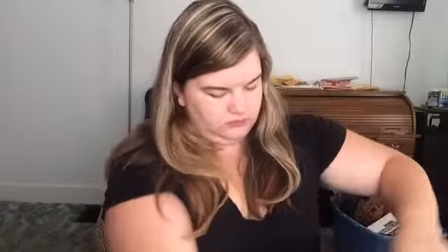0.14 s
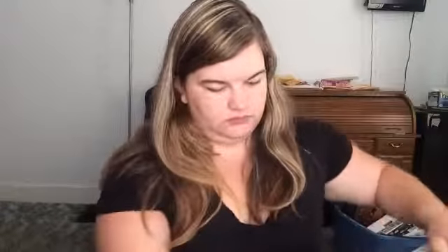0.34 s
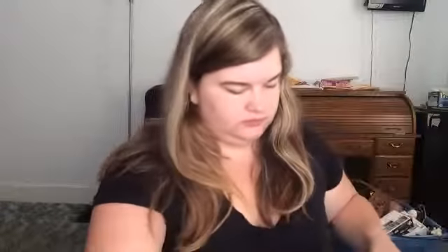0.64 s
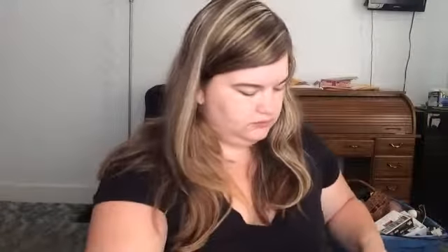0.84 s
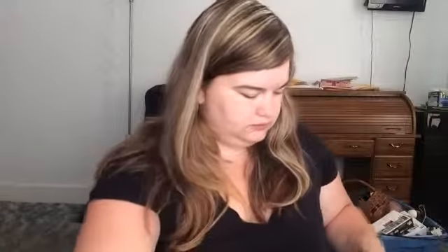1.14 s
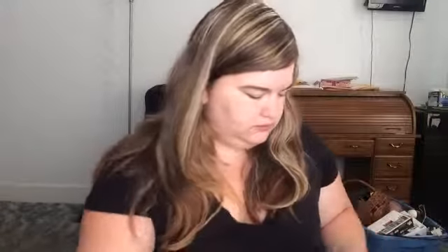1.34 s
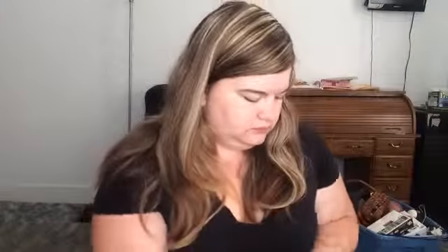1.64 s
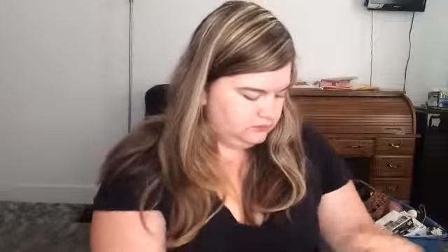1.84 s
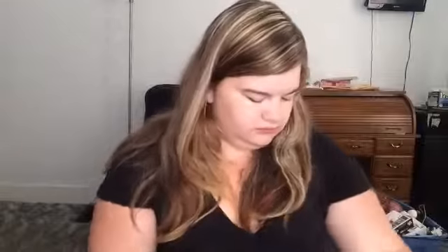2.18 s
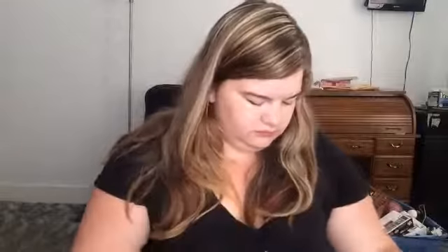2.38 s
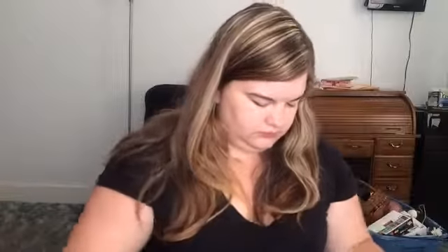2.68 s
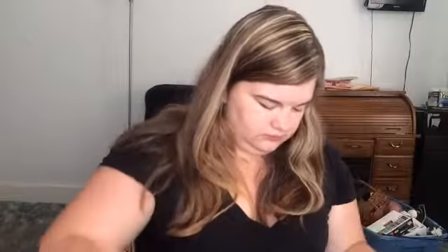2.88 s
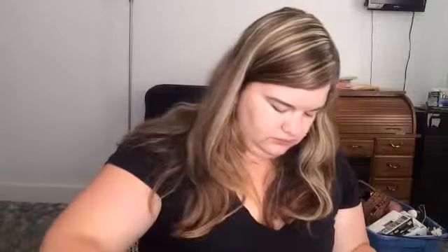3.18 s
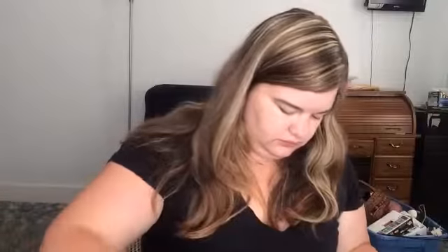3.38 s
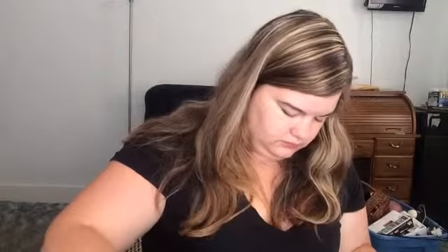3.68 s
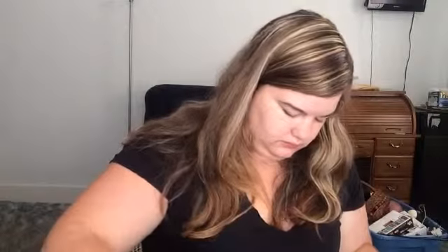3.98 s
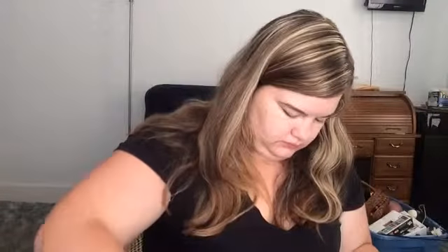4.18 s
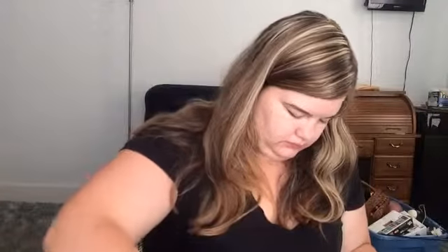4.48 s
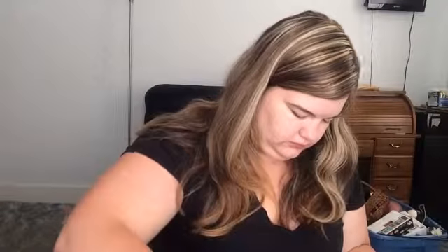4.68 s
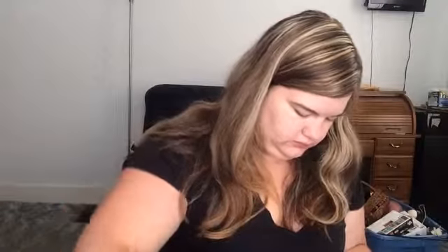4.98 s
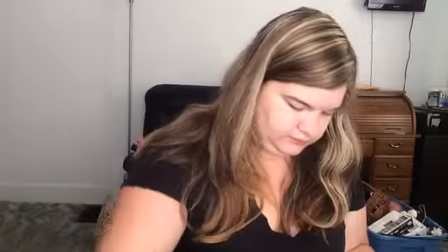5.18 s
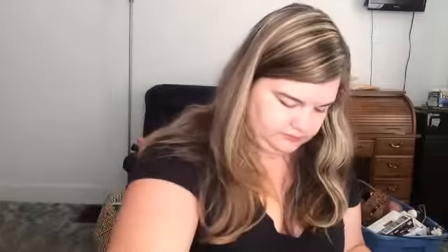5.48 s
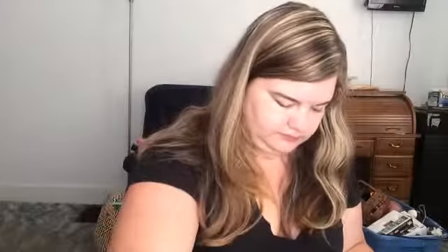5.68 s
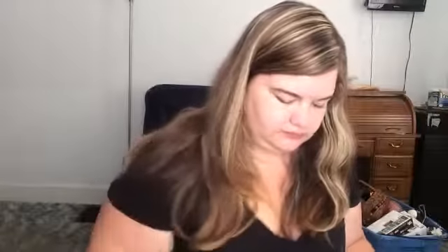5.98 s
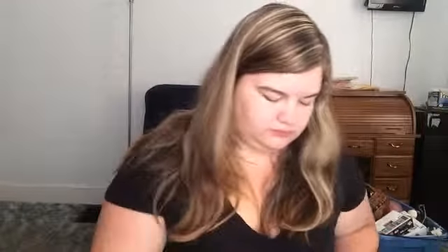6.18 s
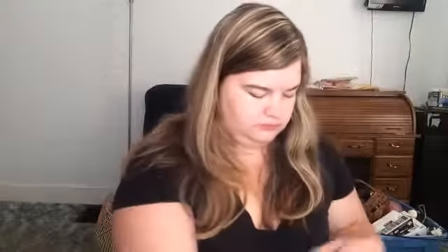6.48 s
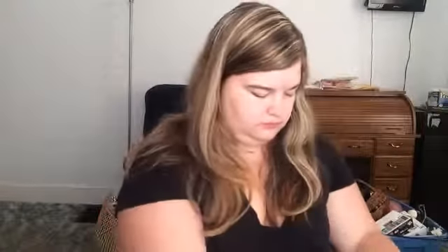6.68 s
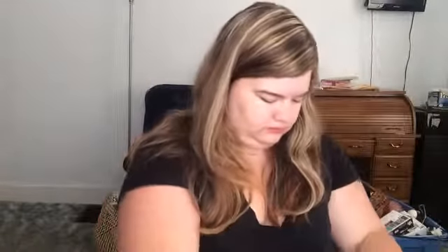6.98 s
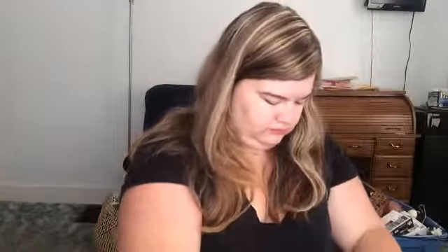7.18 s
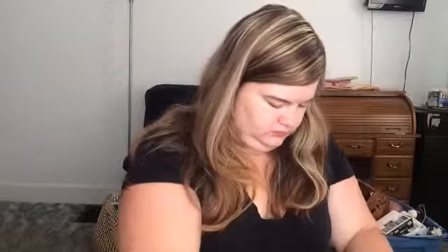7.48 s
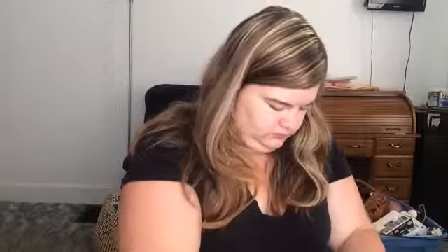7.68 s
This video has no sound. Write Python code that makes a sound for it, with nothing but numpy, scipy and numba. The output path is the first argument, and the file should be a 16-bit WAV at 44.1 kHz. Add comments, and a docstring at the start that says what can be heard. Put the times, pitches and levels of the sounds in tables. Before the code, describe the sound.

Close cardboard handling in a small room: dull thumps, scrapes and crisp cracks, a hard rattling scissors knock, then one heavy thump.

```python
"""A cardboard box is handled on a desk near a microphone in a small room, for just under 8 seconds.
First hands thump and rub the box and tape cracks lightly; at 2 s scissors knock softly on the desk.
The cracking is strongest near 4 s, and from 5.4 to 5.7 s the scissors knock hard: desk and steel ring.
A heavy thump comes near 6.8 s, then sharp cracks and last rubs. Thumps, cracks and desk knocks are
decaying tones and bursts of clicks with a room tail; rubbing is many tiny slips, over quiet room air."""
import sys
import numpy as np
from scipy import signal
from scipy.fft import rfft, irfft
from scipy.io import wavfile
from scipy.ndimage import uniform_filter1d
from numba import njit

SR = 44100
rng = np.random.default_rng(int(sys.argv[2]) if len(sys.argv) > 2 else 0)


def persist_wave(psi):
    """Save psi, clipped to +-1, as 16-bit WAV."""
    counts = np.round(np.clip(psi, -1, 1) * 32767).astype(np.int16)
    wavfile.write(sys.argv[1], SR, np.atleast_2d(counts).T)


N = 345744

# tones that the cardboard panels ring at: one column (pitch [Hz])
PANEL_TONES = [95, 135, 180, 215, 255, 295, 340, 400, 450, 510, 590, 700, 860]
# scissors on the desk: (time [s], peak of the ringing desk [dB], peak of the clack [dB],
# steel ring [dB], strength of the rattle [dB], boom of the desk legs [dB])
SCISSOR_KNOCKS = [(2.072, -26, -40, -78, -19, -35.5), (5.415, -15, -32.5, -61, -11.5, -58),
                  (5.452, -27.5, -44, -80, -8, -63), (5.535, -37, -68, -86, -25, -70),
                  (5.611, -15, -31, -72, -4, -72), (5.692, -15.5, -39, -46, -9.5, -44)]


def thumps(soft_db=10, fall_db=10, near_db=-2, attack_s=0.003, t60=0.064, body_t60=0.14):
    """A soft push rings the panel tones near its own pitch and shoves the whole box."""
    # thumps: (time [s], peak of the panels [dB], pitch of the pressed panel [Hz], whole box [dB])
    thump_table = [(0.104, -42.5, 334, -47), (0.237, -54.5, 443, -65), (0.592, -34, 182, -51),
                   (0.595, -38, 450, -65), (0.638, -30.5, 182, -51), (0.643, -32, 425, -65),
                   (0.668, -33, 332, -53), (0.743, -33, 211, -60), (0.767, -25, 298, -62),
                   (1.007, -41, 232, -70), (1.492, -47.5, 199, -41), (1.514, -45, 415, -59),
                   (1.545, -45, 400, -47), (1.575, -35.5, 170, -37), (1.654, -38, 323, -64),
                   (1.677, -39, 504, -54), (2.606, -45, 420, -66), (2.939, -31.5, 330, -43),
                   (3.076, -38.5, 292, -42), (3.523, -25, 422, -35), (3.539, -42, 446, -47),
                   (3.772, -28.5, 314, -43), (3.831, -36, 273, -61), (3.859, -40, 324, -64),
                   (4.079, -26, 436, -38), (4.123, -27, 315, -34), (4.254, -24.5, 333, -34.5),
                   (4.415, -43, 330, -64), (4.523, -32, 323, -44), (4.632, -33.5, 298, -57),
                   (6.013, -39.5, 261, -47), (6.082, -38, 289, -37), (6.149, -37.5, 311, -58),
                   (6.219, -44, 404, -52), (6.418, -41, 170, -46.5), (6.566, -48, 407, -43),
                   (6.662, -37, 298, -55), (6.714, -29.5, 330, -31), (6.776, -17, 252, -28.5),
                   (6.792, -31, 186, -43), (6.819, -30, 163, -48), (7.089, -35.5, 324, -56),
                   (7.109, -27.5, 340, -57), (7.361, -50.5, 273, -72), (7.44, -48, 290, -51),
                   (7.742, -39.5, 340, -65), (7.805, -35.5, 336, -67)]
    out = np.zeros(N)
    scatter = 3.87 * rng.standard_normal((len(thump_table), len(PANEL_TONES) + 1))
    rise = np.clip(np.arange(SR // 2) / SR / attack_s, 0, 1) ** 2
    for (s, peak_db, hz, body_db), (detune, *chance) in zip(thump_table, scatter):
        modes = [(hz, 0, t60)]
        for tone_hz in PANEL_TONES:
            # quieter with each octave away from the pitch, and again with each octave above 560 Hz
            distance_db = fall_db * abs(np.log2(tone_hz / hz))
            softness_db = soft_db * max(np.log2(tone_hz / 560), 0)
            modes.append((tone_hz, near_db - distance_db - softness_db, t60))
        panels = crest(rise * ring(modes, [0, *chance]), peak_db)
        body = ring([(122 + 3 * detune, body_db, body_t60)], [0])
        add(out, s, panels + rise * body)
    return out


def cracks(tock_t60=0.04, snap_t60=0.012, after_t60=0.11, tock_width=1.172, after_width=2.75):
    """A tock of the board and a bright snap, then fibres and glue that go on crackling."""
    # cracks of tape and board: (time [s], peak of the tock [dB], pitch of the tock [Hz],
    # bright snap before the offsets below [dB], crackle after it, relative to tock and snap [dB])
    crack_table = [(0.205, -49, 3060, -59, -11), (0.443, -59, 1130, -66, -5), (0.54, -46.5, 1860, -62, -14),
                   (0.61, -43, 1810, -42, -20), (0.641, -38, 1100, -43.5, -10),
                   (1.54, -40.5, 1080, -66, -11.5), (1.681, -40, 860, -68, -12),
                   (1.701, -41, 900, -39.5, -30), (2.607, -49, 1480, -52, -1),
                   (2.939, -48.5, 834, -59.5, -9.5), (3.045, -52.5, 1170, -61, -22),
                   (3.058, -60, 3500, -50, -20), (3.077, -43.5, 1970, -37.5, -10.5),
                   (3.376, -47, 1860, -70, -31), (3.387, -43, 1850, -71, -40),
                   (3.521, -39.5, 860, -54, -3.5), (3.771, -39, 890, -39.5, -3.5),
                   (3.785, -40, 2420, -32, -19), (3.864, -34, 936, -37, -10.5),
                   (4.082, -23, 910, -25.5, -9), (4.122, -26, 3240, -41, -11), (4.138, -29, 3650, -36, -24),
                   (4.255, -25, 850, -25.5, -13), (4.424, -35.5, 1130, -48, -9.5),
                   (4.5, -32.5, 3500, -55, -21), (4.524, -36, 3150, -52, -11), (4.619, -35, 1200, -50, -9),
                   (4.634, -30.5, 3380, -55, -7), (4.643, -46, 1630, -35.5, -15.5),
                   (4.873, -48, 2100, -56, -28), (5.026, -40, 1500, -33.5, -12),
                   (6.011, -47, 855, -52, -12), (6.424, -45, 1138, -62, -16),
                   (6.667, -35, 950, -50.5, -9.5), (6.717, -34.5, 840, -62, -32),
                   (6.778, -34.5, 890, -51, -10.5), (7.082, -42, 1480, -40, -11),
                   (7.091, -29.5, 1450, -40, -4), (7.111, -22.5, 2670, -48, -4),
                   (7.293, -53, 3520, -51, -11.5), (7.7, -58, 2210, -42.5, -26),
                   (7.721, -41.5, 1940, -38.5, -6)]
    out = np.zeros(N)
    for s, tock_db, hz, snap_db, after_db in crack_table:
        tock = band(breaking(), hz / tock_width, hz * tock_width)
        fibres = band(breaking(), hz / after_width, hz * after_width)
        snap = band(breaking(), 1900, 12500)
        start = crest(tock * fade(tock_t60, .25), tock_db)
        start += crest(snap * fade(snap_t60, .25), snap_db + 6)
        # the snap played backwards gives the bright part of the crackle
        after = undb(tock_db - 0.5) * unit(fibres) + undb(snap_db + 1) * unit(snap[::-1])
        add(out, s, start + undb(after_db) * fade(after_t60, .25) * after)
    return out


def breaking():
    """One sharp break of a fibre, then the grit that follows, for a quarter of a second."""
    clicks = grit(SR // 4, 3.2, .3)
    clicks[0] = undb(11)  # level of the fibre that breaks first [dB]
    return clicks


def knocks(clack_t60=0.13, rattle_t60=0.22):
    """The desk rings under a short blow and the rattle after it; the handles clack, the legs boom."""
    # tones of the desk top: (pitch [Hz], level before each blow's random change [dB])
    desk_table = [(180, -45), (203, 4), (260, -0.5), (320, -2.5), (393, 2.5), (500, -3.5), (592, 6),
                  (642, -15), (700, 4), (870, 1.5), (1095, -8), (1147, 2), (1207, 3), (1265, -19),
                  (1360, -8.5), (1600, -0.5), (1930, 3), (2075, -7.5), (2200, -6), (2510, -6.5),
                  (2680, -10), (3120, -6.5), (3350, -14.5), (3900, -5), (4500, -4)]
    # boom of the desk legs: (pitch [Hz], level on top of each knock's boom [dB], time to fall 60 dB [s])
    boom_table = [(114, 3, 0.14), (112.5, -17, 4)]
    contact_s = 0.00035  # length of the blow, before a few samples are added
    most_cycles, longest_t60 = 60, .042  # a tone falls 60 dB in so many cycles or seconds, if sooner
    out = np.zeros(N)
    scatter = 1.7 * rng.standard_normal((len(SCISSOR_KNOCKS), len(desk_table)))
    modes = [(hz, db, min(most_cycles / hz, longest_t60)) for hz, db in desk_table]
    for (s, desk_db, clack_db, _, rattle_db, boom_db), chance in zip(SCISSOR_KNOCKS, scatter):
        force = undb(rattle_db) * grit(SR // 2, 0.37, 0.084) * fade(rattle_t60)
        push = np.hanning(int(contact_s * SR) + 3)
        force[:len(push)] += push / push.sum()  # the blow itself
        desk = signal.fftconvolve(force, ring(modes, chance))[:SR // 2]
        desk = band(desk, 150, 9000)  # the desk rings only between 150 Hz and 9 kHz, with no deep bass
        clack = band(rng.standard_normal(SR // 2), 1800, 10000) * fade(clack_t60)
        boom = ring(boom_table, [boom_db, boom_db])
        add(out, s, crest(desk, desk_db) + crest(clack, clack_db) + boom)
    return out


def blades():
    """The steel of the scissors sings thinly after each knock, as a few high decaying tones."""
    # scissor blades: (pitch [Hz], level on top of each knock's ring [dB], time to fall 60 dB [s])
    steel_table = [(5955, -7, .3), (5975, 0, .33), (5995, -3, .3), (7380, -3, .3), (9491, -8, .2),
                   (9959, -9, .25), (11810, -9, .28), (12810, -12, .14)]
    out = np.zeros(N)
    for s, _, _, steel_db, *_ in SCISSOR_KNOCKS:
        add(out, s, ring(steel_table, np.full(len(steel_table), steel_db)))
    return out


def rubbing():
    """Palms and blade slip unevenly: panels hum, the board scrapes and its skin hisses."""
    # tone colour of the scrape: (frequency [Hz], level [dB])
    scrape_table = [(500, -20), (900, 2), (1300, 0), (2200, -2.5), (3000, -7.5), (4500, -14)]
    # tone colour of the hiss: (frequency [Hz], level [dB])
    hiss_table = [(1800, -11.5), (3200, 1.5), (5000, 1), (7900, 2), (8400, -2), (12000, -4.5), (15500, -8)]
    hum_gain, scrape_gain, hiss_gain, flap_hz = pressure()
    grip = walk(30)  # scrape and hiss waver together with it

    modes = [(hz, -4.0 * abs(np.log2(hz / 380)), .09) for hz in PANEL_TONES[2:-2]]
    panels = ring(modes, np.zeros(len(modes)))
    slips = grit(N, 1.5, .02) * undb(2.5 * walk(25))
    hum = unit(signal.fftconvolve(slips, panels)[:N]) * hum_gain

    fibres = grit(N, 2.18, .1)
    flap = unit(resonate(fibres[::-1].copy(), flap_hz, 2.9))  # reversed: different slips from the board's
    board = unit(colour(fibres, scrape_table)) + undb(-3.5) * flap
    scrape = unit(board) * scrape_gain * undb(1.2 * grip + 1.5 * walk(60))

    hiss = unit(colour(grit(N, 2.4, .2), hiss_table)) * hiss_gain * undb(1.8 * grip)
    return hum + scrape + hiss


def pressure():
    """Each stroke swells, holds and eases; the stronger a scrape, the more it sets the flap's tone."""
    # strokes along the board: (start of full pressure [s], time held [s], humming panels [dB],
    # scraping board [dB], hissing surface [dB], tone of the scraped flap [Hz])
    stroke_table = [(0.102, 0.085, -56, -58, -60, 1980), (0.46, 0.087, -67, -68, -75, 1140),
                    (0.589, 0.095, -56, -57, -57.5, 1400), (0.72, 0.076, -49.5, -57, -65, 1010),
                    (0.928, 0.053, -58.5, -60, -64.5, 1480), (1.04, 0.023, -61.5, -67.5, -89, 1400),
                    (1.12, 0.14, -70, -66.5, -71, 1200), (1.30, 0.093, -68.5, -64, -63, 1730),
                    (1.488, .23, -55, -58.5, -60, 1150), (2.17, 0.036, -73, -76, -71, 1720),
                    (2.28, 0.025, -69.5, -66, -66.5, 2000), (2.539, 0.1, -61.5, -58, -57.5, 1810),
                    (2.77, .05, -62.5, -65.5, -76.5, 900), (3.051, 0.045, -56, -65.5, -72, 3000),
                    (3.31, 0.084, -70.5, -70, -69, 3100), (3.48, 0.049, -68, -69, -80, 2100),
                    (3.678, 0.057, -51.5, -58.5, -62, 1120), (3.81, 0.069, -77, -58.5, -68, 2260),
                    (3.99, .08, -63, -58, -65, 3650), (4.10, 0.023, -47, -54, -50.5, 1000),
                    (4.16, 0.031, -50, -43, -48.5, 1140), (4.27, 0.021, -59, -52.5, -57, 1010),
                    (4.441, 0.062, -51, -59.5, -55, 1100), (4.509, 0.036, -53.5, -53, -45.5, 3500),
                    (4.60, 0.044, -46.5, -48, -50, 1030), (4.74, 0.049, -65.5, -61, -60.5, 1120),
                    (4.85, 0.013, -70, -66.5, -69, 2000), (5.05, 0.017, -77, -63, -60, 1400),
                    (5.48, 0.11, -52, -52.5, -82, 1140), (5.70, 0.034, -74, -41, -78, 1210),
                    (5.88, 0.12, -71, -74, -71.5, 1090), (6.02, 0.13, -61.5, -63.5, -64.5, 1190),
                    (6.18, 0.12, -59, -59.5, -62, 1500), (6.35, 0.17, -61, -66, -68.5, 1190),
                    (6.589, 0.17, -57, -59, -62, 1110), (6.85, .22, -56.5, -59, -59.5, 1390),
                    (7.149, 0.013, -66, -45.5, -59, 3030), (7.25, 0.075, -64.5, -68, -68.5, 2980),
                    (7.50, 0.16, -63, -69, -75, 1330), (7.732, 0.034, -60, -53.5, -54, 2420),
                    (7.80, 0.02, -53, -47.5, -56, 2020)]
    # hands resting on the box: one row (hum [dB], scrape [dB], hiss [dB])
    resting_table = -80, -91, -88.5
    swell_rate, ease_rate = 288, 203  # dB per second, before and after full pressure
    t = np.arange(0, N + 128, 128) / SR  # a coarse clock is enough for slow hands
    s, held, *levels_db, hz = np.transpose(stroke_table)[:, :, None]
    before, after = np.clip(s - t, 0, None), np.clip(t - s - held, 0, None)
    shape_db = -swell_rate * before - ease_rate * after
    power = [undb(db + shape_db) ** 2 for db in levels_db]
    gains = [np.sqrt(p.sum(axis=0) + undb(db) ** 2) for p, db in zip(power, resting_table)]
    scrape_power = power[1]
    flap_hz = (scrape_power * hz).sum(axis=0) / scrape_power.sum(axis=0)
    return [np.interp(np.arange(N) / SR, t, curve) for curve in [*gains, flap_hz]]


def shaking():
    """Desk and floor shake as weight shifts: low noise that swells and sinks."""
    # strength of the shaking, joined in time: (time [s], level [dB])
    rumble_table = [(0.0, -58), (0.78, -70.5), (4.11, -64), (5.35, -75), (5.63, -58), (5.81, -71),
                    (6.44, -75), (6.6, -55), (7.84, -77)]
    # tone colour of the shaking: (frequency [Hz], level [dB])
    shake_table = [(30, -3), (60, -3.5), (85, -10.5), (110, -1), (150, -5.5), (200, -25)]
    s, db = np.transpose(rumble_table)
    level_db = np.interp(np.arange(N) / SR, s, db)
    return unit(colour(rng.standard_normal(N), shake_table)) * undb(level_db + 1.2 * walk(9.5))


def room(x):
    """A dense tail starts after the nearest wall answers; bass and treble fade at their own pace."""
    bass_t60, tail_db, gap_s = 0.18, -6.5, .006
    noise = rng.standard_normal((2, SR // 2))
    bass = band(noise[0], 58, 3100) * fade(bass_t60)
    treble = band(noise[1], 2370, 24000) * fade(1.19 * bass_t60)
    tail = bass + treble
    tail = tail / np.sqrt(np.sum(tail ** 2))
    tail = np.concatenate([np.zeros(int(gap_s * SR)), tail])
    return undb(tail_db) * signal.fftconvolve(x, tail)[:N]


def air():
    """Quiet house rumble and microphone hiss: shaped noise, wavering a little around -68 dB."""
    # tone colour of the background: (frequency [Hz], level [dB])
    air_table = [(15, -25), (25, -15), (64, 2.5), (122, 3), (240, -18), (305, 0), (666, -15.5), (1050, -11),
                 (5730, -24), (7700, -21), (8350, -25), (14300, -28.5), (15500, -32)]
    return unit(colour(rng.standard_normal(N), air_table)) * undb(-68 + 1.2 * walk(7.0))


def undb(db):
    """Turn decibels into a gain."""
    return 10 ** (np.asarray(db) / 20)


def unit(x):
    """Scale to an average strength (rms) of 1."""
    return x / np.sqrt(np.mean(x ** 2))


def crest(x, db):
    """Scale so that the highest peak has the given level."""
    return x * undb(db) / np.max(np.abs(x))


def fade(t60, seconds=.5):
    """A smooth decay that falls 60 dB in t60 seconds (5 ms at the shortest)."""
    return np.exp(-np.log(1000) * np.arange(int(seconds * SR)) / SR / max(t60, .005))


def colour(x, points):
    """Shape the spectrum by (Hz, dB) points joined on a log axis, at -90 dB outside them."""
    hz, db = np.transpose(points)
    log_hz = np.log(np.arange(1, len(x) // 2 + 2) * SR / len(x))
    gain = undb(np.interp(log_hz, np.log(hz), db, -90, -90))
    return irfft(rfft(x) * gain, len(x))


def band(x, lo_hz, hi_hz):
    """Keep the sound between two frequencies."""
    edges = [lo_hz, min(hi_hz, .45 * SR)]
    return signal.sosfilt(signal.butter(2, edges, "bandpass", fs=SR, output="sos"), x)


def ring(modes, changes_db):
    """Half a second of decaying tones (Hz, dB, t60 in s), each with a level change in dB."""
    t = np.arange(SR // 2) / SR
    return sum(undb(db + change) * fade(t60) * np.sin(2 * np.pi * hz * t)
               for (hz, db, t60), change in zip(modes, changes_db))


def add(out, s, x):
    """Mix a sound in at time s."""
    i = int(s * SR)
    out[i:i + len(x)] += x[:len(out) - i]


def grit(size, spread_db, share):
    """Tiny slips: a share of the samples carries a click, a few far louder than the rest."""
    chance = rng.random((size, 2))
    clicks = chance[:, 0] < share
    loudness = np.minimum(-np.log(1 - chance[:, 1]), 6)  # capped, in spreads above the weakest slip
    return clicks * undb(spread_db * loudness) * rng.standard_normal(size)


def walk(rate):
    """Random levels, about rate of them per second, joined by straight slides."""
    k = int(SR / rate)
    return uniform_filter1d(np.repeat(rng.standard_normal(N // k + 1), k), k)[:N]


@njit
def resonate(x, hz, sharpness):
    """Band-pass whose centre moves, with gain 1 at the centre."""
    y, b, l, k = np.empty(len(x)), 0., 0., 1 / sharpness  # b and l: the filter's memory
    for i in range(len(x)):
        g = np.tan(np.pi * hz[i] / SR)
        v = (b + g * (x[i] - l)) / (1 + g * (g + k))
        b, l, y[i] = 2 * v - b, l + 2 * g * v, k * v
    return y


def scene():
    """Thumps, cracks and desk knocks with their room tail, over steel, rubbing, shaking and air."""
    blows = thumps() + cracks() + knocks()
    return (blows + room(blows) + blades() + rubbing() + shaking() + air())[None]


def record(dry):
    """The small microphone weakens the deepest bass; the recorder cuts the top above 15.4 kHz."""
    thin = signal.sosfilt(signal.butter(2, 55, "highpass", fs=SR, output="sos"), dry)
    return signal.sosfilt(signal.ellip(10, .2, 60, 15400, fs=SR, output="sos"), thin)


dry = scene()
out = record(dry)
persist_wave(out)
```